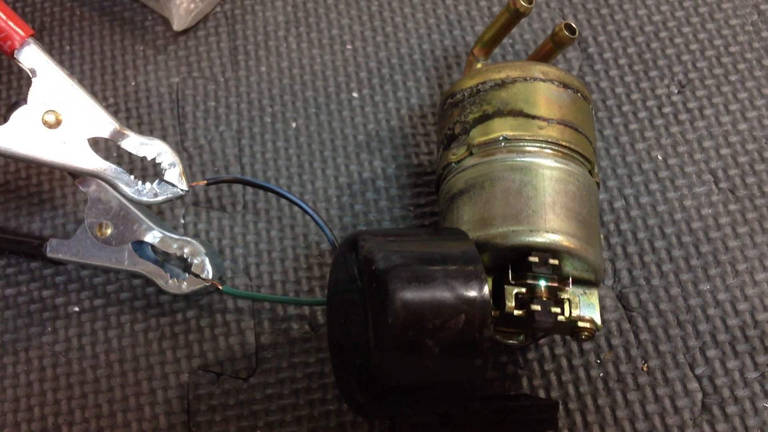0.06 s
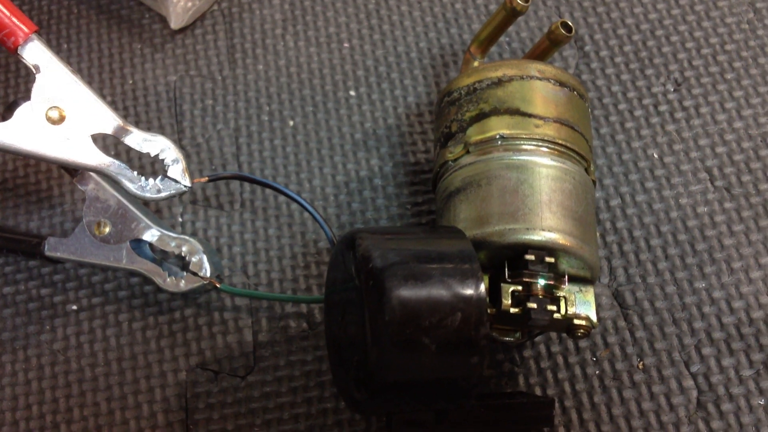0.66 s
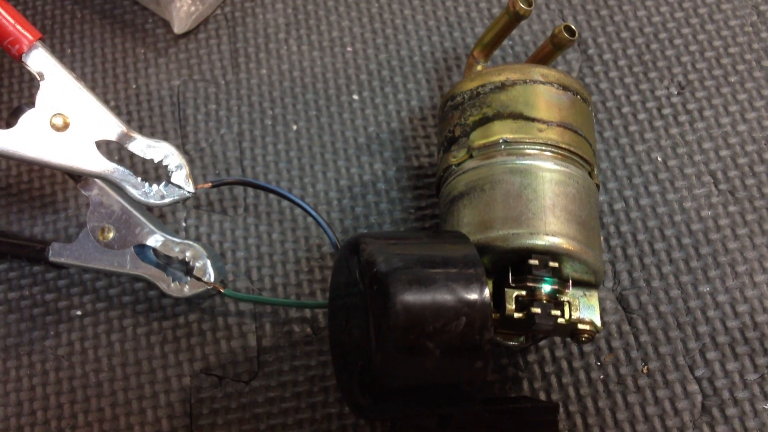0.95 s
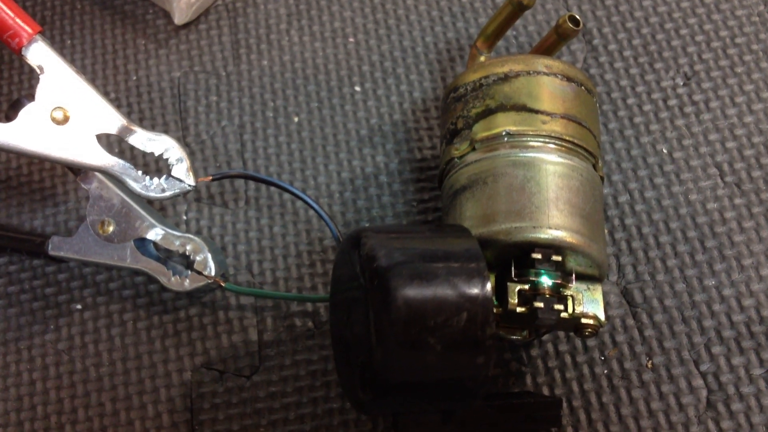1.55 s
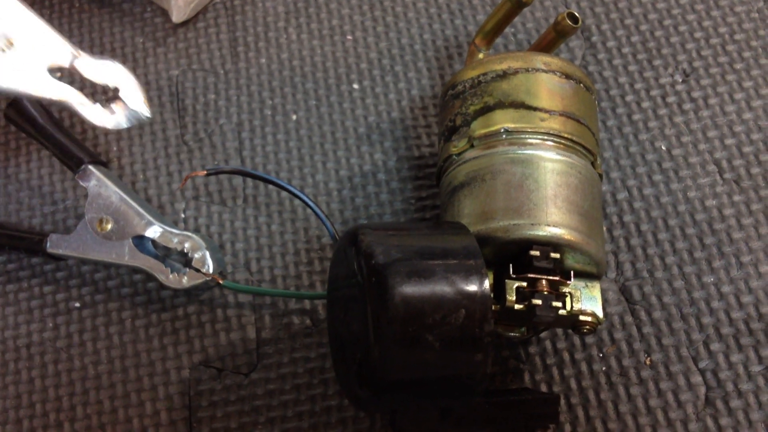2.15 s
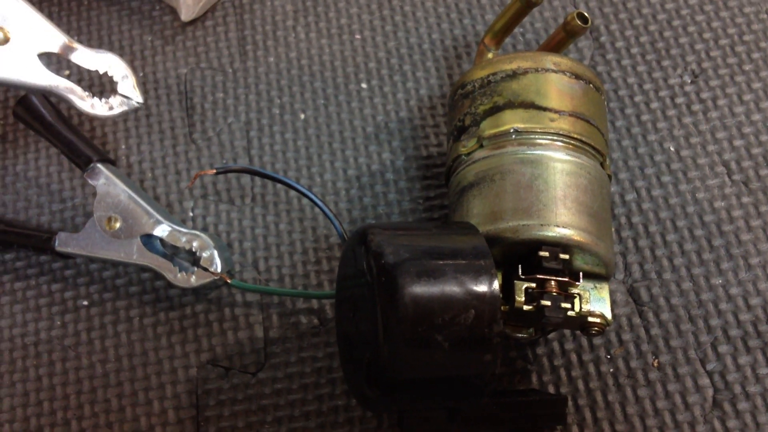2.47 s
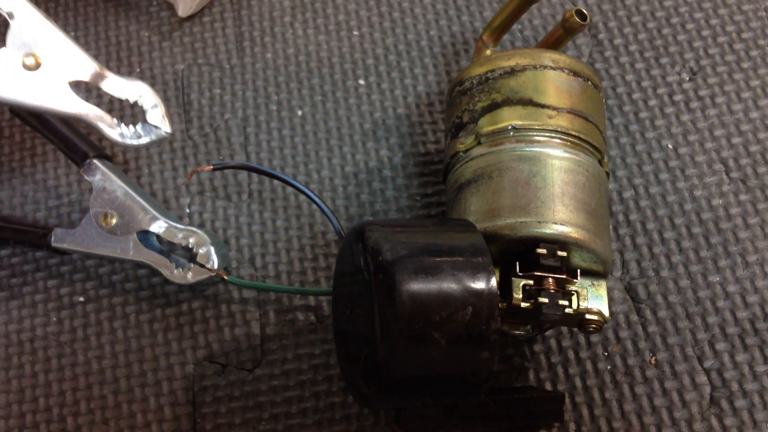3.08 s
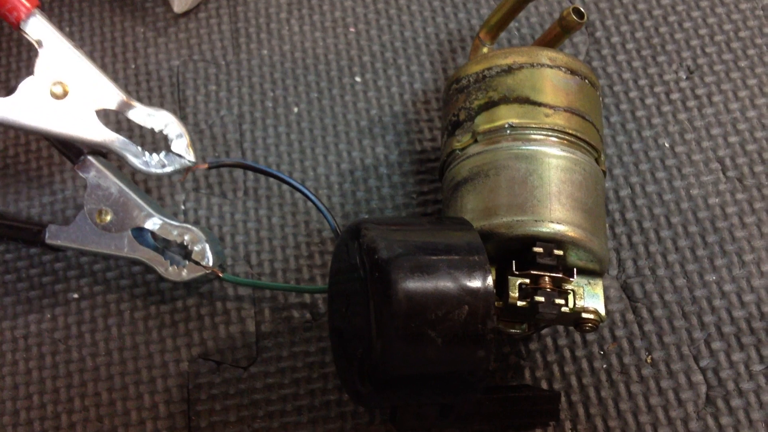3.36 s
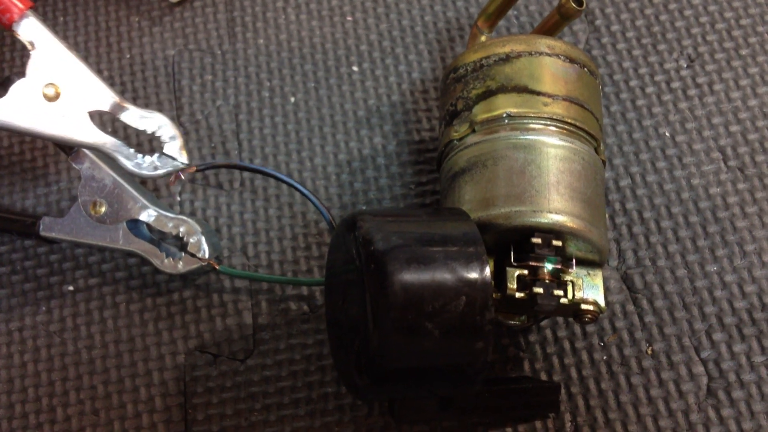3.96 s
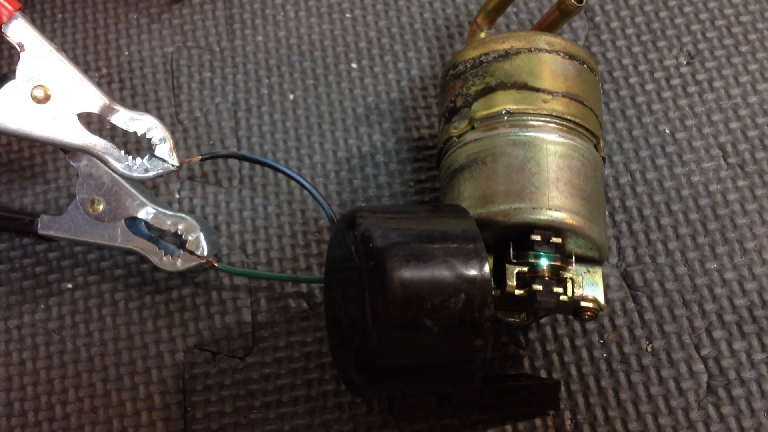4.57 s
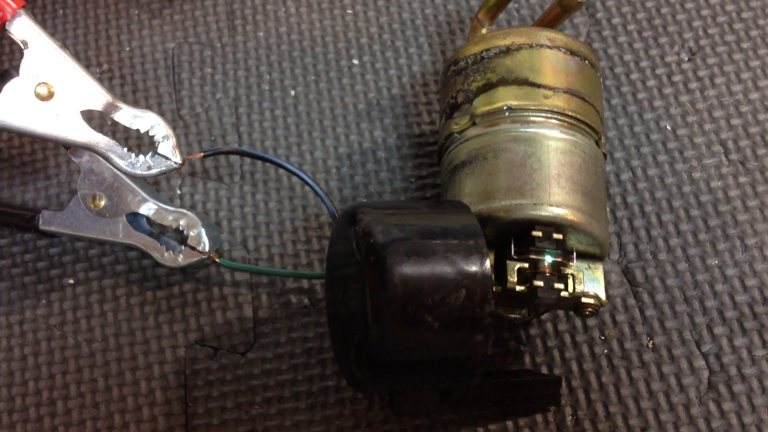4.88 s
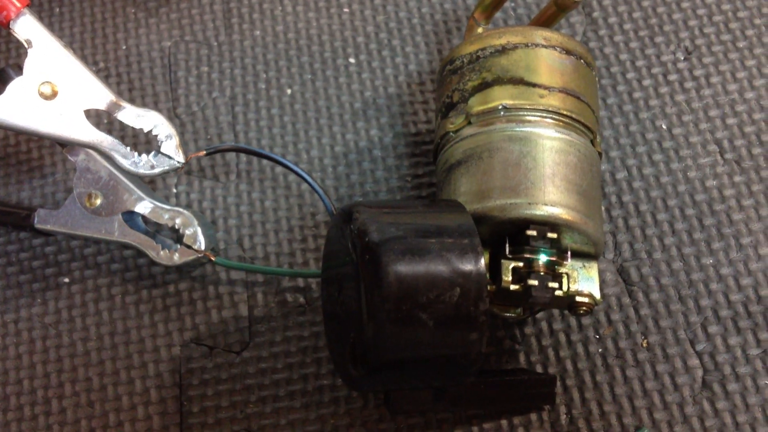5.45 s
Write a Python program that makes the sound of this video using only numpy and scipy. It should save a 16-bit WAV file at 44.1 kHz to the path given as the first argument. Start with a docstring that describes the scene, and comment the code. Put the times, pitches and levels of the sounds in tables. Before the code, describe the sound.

A small electric fuel pump runs dry with a rapid, even clatter of metallic clacks, sharp contact ticks and light thumps. It stops abruptly as its wire is lifted, leaving faint room air and a barely audible charger hum. It gives one brief burst, pauses, then stutters back to life and runs evenly. The microphone is close, in a small room.

```python
"""A small room, a hand-held microphone close to a solenoid fuel pump on a rubber mat, a charger humming.
The pump runs dry, about 34 strokes a second: in each the coil jerks the plunger, the contact points
chatter and the plunger slams against its stop. At 2 s the lead is lifted, leaving hum and room air.
At 3.4 s it is touched back for four strokes; at 3.9 s it is put on again, and the pump stutters,
then runs evenly to the end."""
import sys
import numpy as np
from scipy import signal
from scipy.fft import rfft, irfft
from scipy.io import wavfile

SR = 44100
rng = np.random.default_rng(int(sys.argv[2]) if len(sys.argv) > 2 else 0)


def to_wav(sig):
    """Store sig (one row per channel, or 1-D mono) as 16-bit WAV at the path in sys.argv[1].

    Samples outside -1..1 are clipped; the rate is SR.
    """
    pcm = np.clip(np.atleast_2d(sig), -1, 1) * 32767
    pcm = np.round(pcm).astype(np.int16)
    wavfile.write(sys.argv[1], SR, pcm.T)  # frames by channels


N = 252252
RIPPLE_HZ = 120   # the charger's rectified mains

# The pump's runs: on a firm contact it locks to 3.5 ripple cycles a stroke, on a loose one it drags.
# Each row: first slam, last slam, first gap and last gap, all in seconds, then relative force in dB.
STROKE_RUNS = [(0.0003, 0.319, 0.029, 0.03, -1.1), (0.3477, 1.5726, 0.029, .0291, -0.5),
               (1.6012, 2.0204, 0.028, 0.032, 0), (3.4342, 3.5366, .0325, 0.036, 0.8),
               (3.9452, 4.0242, 0.048, .031, 0.5), (4.058, 4.1526, .0442, 0.05, -0.8),
               (4.1926, 4.4347, .0403, .0292, 0), (4.4797, 4.5472, 0.035, 0.031, 0.1),
               (4.5764, 5.1880, .0291, 0.029, -0.7), (5.2186, 5.7144, 0.028, 0.029, 0)]
# The lead goes back on the charger. Each entry: time in seconds.
LEAD_ON_S = [3.41, 3.92]

def strokes(jitter_s, uneven_db, swing_s, surge_db, surge_s):
    """Slam times and forces: the ripple swings the beat early and late; a rested coil hits harder."""
    slam, force_db = np.transpose([(s, db) for *timing, db in STROKE_RUNS for s in run_times(*timing)])
    surge = np.zeros(len(slam))
    for on in LEAD_ON_S:
        surge = np.where(slam > on, np.exp(-np.abs(slam - on) / surge_s), surge)
    chance = rng.standard_normal((len(slam), 2)).T
    swing = swing_s * np.sin(2 * np.pi * RIPPLE_HZ * slam)
    return slam + swing + jitter_s * chance[0], force_db + surge_db * surge + uneven_db * chance[1]


def run_times(first, last, first_gap, last_gap):
    """Slam times of one run: the gap glides evenly from its first length to its last."""
    gaps = np.linspace(first_gap, last_gap, round(2 * (last - first) / (first_gap + last_gap)))
    return first + (last - first) * np.append(0, np.cumsum(gaps)) / gaps.sum()


# The pump rocking on its mat, with its diaphragm. Each row: pitch in Hz, width in Hz, gain in dB.
BODY_MODES = [(205, 78, -15), (325.43, 184, -7), (310, 16, 2.5), (396, 122, -9.5), (502, 15, -25.5),
              (551, 27, -7), (728, 36, -20)]

def body_thumps(slam, force_db):
    """Three shoves rock the body: the coil jerks the plunger, the diaphragm tautens, the plunger stops."""
    chance = rng.standard_normal((len(slam), 4)).T
    # with the ripple, the pull starts early or late, hard or soft, and ends quickly or slowly
    ripple = 2 * np.pi * RIPPLE_HZ * slam
    late, quick, crest = np.sin(ripple), np.cos(ripple), np.cos(ripple + 1.07)
    db = .5 * force_db   # the soft mat evens out the strokes
    trade_db = 1.3 * np.tanh(chance[1]) - 2.44 * crest   # a hard jerk leaves less for the diaphragm
    jerk = -clicks(slam - .01646 + .0016 * late + .00033 * chance[0], db + 16.5 + trade_db)
    taut = clicks(slam - .00894 + .00059 * quick + .00029 * chance[2], db + 22.5 - trade_db)
    stop = clicks(slam - .00366 - .00038 * quick, db + 22.5 + .87 * chance[3])
    soft = cut(jerk + stop, 653, "low", order=2)   # these two push for longer, so they sound deeper
    shove = cut(soft + taut, 593, "low", order=3)
    bass = cut(shove, 120, "low", order=3)
    mat = from_db(-32.5) * cut(bass, 30.3, "high", order=1)
    return cut(resonate(shove, BODY_MODES), 197, "high", order=4) + mat


# The pump's steel can, heard close. Each row: pitch in Hz, width in Hz, gain in dB.
CAN_MODES = [(1057, 210, -2.5), (1320, 240, -6.5), (1540, 437, -5), (1860, 147, -3), (1970, 120, -5.5),
             (2215, 44, -13.5), (2590, 640, -10), (3470, 400, -10.5), (3800, 100, -1.5), (4134, 190, -2),
             (4396, 98, 4), (4658, 233, 2.5), (4984, 280, -3), (5280, 370, -8), (5790, 154, -8.5),
             (6392, 355, 1), (6840, 180, -5.5), (8160, 104.5, -18), (11700, 4300, -6.5),
             (13200, 3200, -7.5)]

def plunger_clacks(slam, force_db):
    """The plunger starts to slide, scrapes along its bore and strikes the stop, which rings the can."""
    chance = rng.standard_normal((len(slam), 3)).T
    slide = rattle(slam - .0115 + .001 * chance[0], force_db - 10, decay_s=.00596)
    scrape = rattle(slam - .0058 + .00024 * chance[0], force_db - .5, decay_s=.0081)
    hit = clicks(slam - .0006, force_db + 3 + 1.103 * chance[1])
    cushioned_hit = cut(hit, 4000, "low", order=1)
    bounce = rattle(slam - .0003, force_db + 2.5 + .98 * chance[2], decay_s=.0071)
    return cut(resonate(slide + scrape + cushioned_hit + bounce, CAN_MODES), 760, "high", order=2)


# The contact points and their spring. Each row: pitch in Hz, width in Hz, gain in dB.
CONTACT_MODES = [(9180, 500, -37), (9484, 340, -3), (10210, 430, -4), (10900, 370, -4), (12105, 510, 0.5),
                 (13560, 280, -7), (15100, 600, -35.5)]
# Strokes in which the points fail to snap. Each entry: time in seconds.
DULL_STROKES_S = [0.0, 0.028, 0.057, 0.203, 0.320, 1.077, 1.396, 1.601, 4.152, 4.576, 4.664, 4.896, 5.423]

def contact_snaps(slam, force_db):
    """The points chatter as the lever tips, then snap over and rebound once at the end of the stroke."""
    chance = rng.standard_normal((len(slam), 5)).T
    dull = np.abs(slam[:, None] - np.array(DULL_STROKES_S)).min(axis=1) < .014
    db = force_db - 19 * dull
    touch = rattle(slam - .0064 + .0003 * chance[0], force_db + 1.5, decay_s=.0028)
    chatter = rattle(slam - .0046 + .0005 * chance[1], db + 9.5 + 2.3 * chance[2], decay_s=.00091)
    snap = clicks(slam - .0002, db + 9.5 + 1.2 * chance[3])
    rebound = clicks(slam + .00025 + .00007 * chance[4], db + 6.5)
    shiver = rattle(slam, db + 9.5 + .89 * chance[3], decay_s=.0009)
    spring = rattle(slam, force_db - 6, decay_s=.0062)   # the spring trembles on briefly
    force = touch + chatter + snap + rebound + shiver + cut(spring, 13000, "high", order=2)
    return cut(resonate(force, CONTACT_MODES), 9470, "high", order=2)


def coil_buzz(slam, force_db, pull_s):
    """While it pulls, the coil buzzes at overtones of the supply ripple."""
    swell = np.hanning(int(1.32 * pull_s * SR))
    pull = signal.fftconvolve(clicks(slam - pull_s, force_db), swell)[:N]
    ripple = 2 * np.pi * RIPPLE_HZ * np.arange(N) / SR
    return pull * (from_db(-35.5) * np.sin(2 * ripple) + from_db(-32.5) * np.sin(4 * ripple))


# The small room's decay. Each row: frequency in Hz, time to fall 60 dB in seconds.
ROOM_DECAY = [(150, 0.49), (400, 0.52), (1000, 0.41), (2200, 0.4), (4500, 0.59), (9500, 0.26),
              (13000, 0.26)]

def echoes(near_db, near_s, tail_db):
    """The room at one microphone spot: echoes from things close by, then a tail that dies band by band."""
    t = np.arange(int(.6 * SR)) / SR
    hz = np.fft.rfftfreq(len(t), 1 / SR)
    white = rfft(rng.standard_normal(len(t)))
    edges_hz = np.geomspace(60, 17000, 14)
    tail = 0
    for low, high in zip(edges_hz, edges_hz[1:]):
        band = irfft(white * ((hz >= low) & (hz < high)), len(t))
        tail = tail + band * from_db(-60 * t / at_hz(ROOM_DECAY, np.sqrt(low * high)))
    tail = tail * (t > .006)
    tail = tail - .5 * cut(tail, 630, "low", order=1)   # the bass is heard mostly direct
    near = rng.standard_normal(len(t)) * np.exp(-t / near_s) * (t > .0022)
    near = cut(near, 800, "high", order=2)   # small things reflect only short waves
    return from_db(near_db) * near / np.linalg.norm(near) + from_db(tail_db) * tail / np.linalg.norm(tail)


def room(x, sway_hz):
    """The hand-held microphone sways between two spots, so the echoes keep changing."""
    spots = [echoes(near_db=-12.5, near_s=.0041, tail_db=-15.5) for _ in range(2)]
    here, there = [signal.fftconvolve(x, spot)[:N] for spot in spots]
    sway = 2 * np.pi * sway_hz * np.arange(N) / SR
    return np.cos(sway) * here + np.sin(sway) * there


# The air around the microphone. Each row: frequency in Hz, relative spectral density in dB.
AIR_SPECTRUM = [(24, -46.5), (40, -37.5), (114, -16), (207, -8), (241, -5.5), (333, -16), (368, -7),
                (397, -19.5), (591, 1.5), (949, -16), (1020, -19), (2390, -21), (2570, -20.5),
                (4350, -22.5), (15500, -27)]

def room_air(rms_db):
    """Still air in the room: a steady noise, strongest in the low mids."""
    gain = from_db(at_hz(AIR_SPECTRUM, np.fft.rfftfreq(N, 1 / SR)))
    air = irfft(rfft(rng.standard_normal(N)) * gain, N)
    return from_db(rms_db) * air / air.std()


# The charger, faint at the microphone. Each row: pitch in Hz, rms level in dB.
HUM_TONES = [(120, -90), (240, -80), (360, -83), (480, -79), (600, -81), (720, -88), (840, -83), (960, -85),
             (1080, -91), (1680, -93), (2520, -88), (2610, -92)]

def charger_hum():
    """The transformer hums at overtones of the mains, with a faint whine."""
    t = np.arange(N) / SR
    return sum(from_db(db) * np.sqrt(2) * np.sin(2 * np.pi * (hz * t + rng.random()))
               for hz, db in HUM_TONES)


def clicks(times, db):
    """One click of the given level at each time."""
    out, at = np.zeros(N), np.round(times * SR).astype(int)
    heard = (at >= 0) & (at < N)
    np.add.at(out, at[heard], from_db(db)[heard])
    return out


def rattle(times, db, decay_s):
    """Bursts of tiny bounces that die away, each with the energy of one click."""
    r = np.exp(-1 / (decay_s * SR))
    envelope = signal.lfilter([np.sqrt(1 - r * r)], [1, -r], clicks(times, db) + 1e-18)
    return envelope * rng.standard_normal(N)


def resonate(force, modes):
    """Parallel resonances driven by one force."""
    out = np.zeros(N)
    for hz, width, db in modes:
        r = np.exp(-np.pi * width / SR)
        poles = [1, -2 * r * np.cos(2 * np.pi * hz / SR), r * r]
        out += from_db(db) * (1 - r * r) / 2 * signal.lfilter([1, 0, -1], poles, force + 1e-18)
    return out


def cut(x, hz, kind, order):
    """Butterworth filter; kind names the side that passes."""
    return signal.sosfilt(signal.butter(order, hz, kind, fs=SR, output="sos"), x)


def from_db(db):
    """Decibels to gain."""
    return 10 ** (np.asarray(db) / 20)


def at_hz(points, hz):
    """Read a table along a log-frequency axis."""
    points = np.array(points)
    return np.interp(np.log(np.maximum(hz, 1)), np.log(points[:, 0]), points[:, 1])


def scene():
    """At the one microphone: the pump close by, its echoes, and air and hum behind."""
    slam, force_db = strokes(jitter_s=.00012, uneven_db=.33, swing_s=.0005, surge_db=2.5, surge_s=.41)
    pump = from_db(.26) * body_thumps(slam, force_db)
    pump += from_db(-.65) * plunger_clacks(slam, force_db)
    pump += from_db(.72) * contact_snaps(slam, force_db)
    pump += coil_buzz(slam, force_db, pull_s=.017)
    return (pump + room(pump, sway_hz=.631) + room_air(rms_db=-66.5) + charger_hum())[None]


def record(dry):
    """The microphone's signal is cut steeply above 15450 Hz."""
    return signal.sosfilt(signal.ellip(10, .3, 80, 15450, fs=SR, output="sos"), dry)


dry = scene()
out = record(dry)
to_wav(out)
```